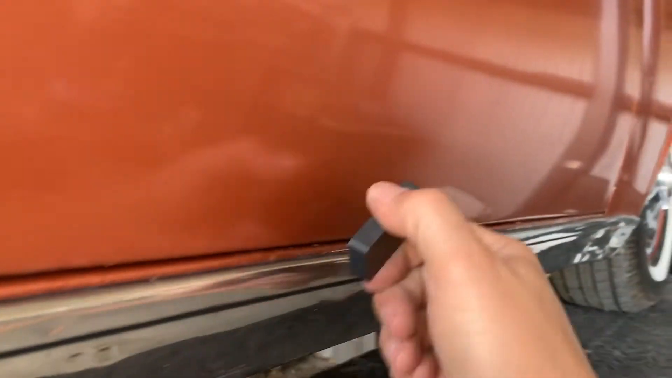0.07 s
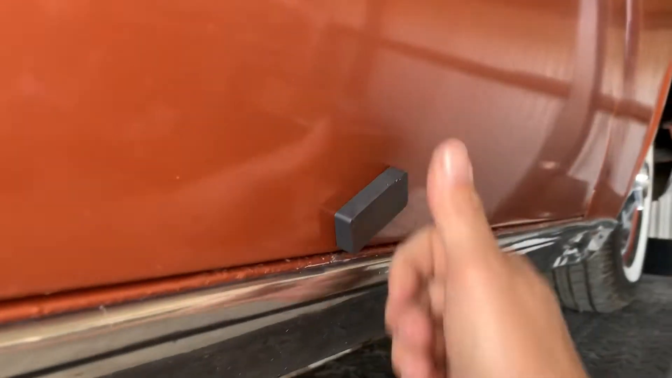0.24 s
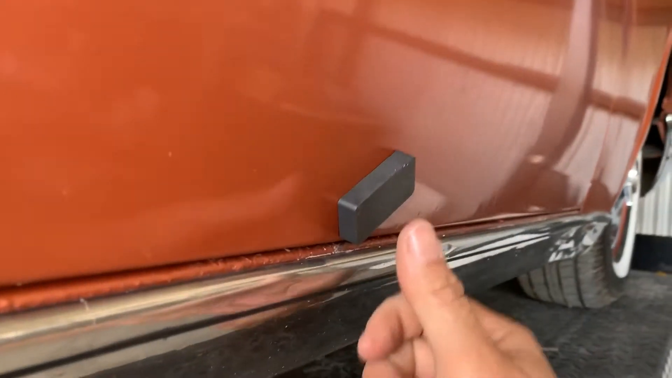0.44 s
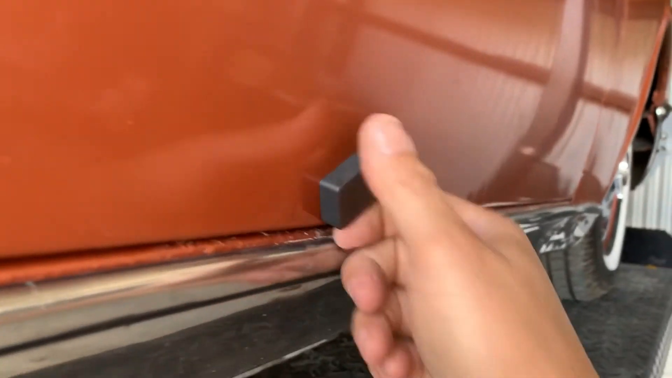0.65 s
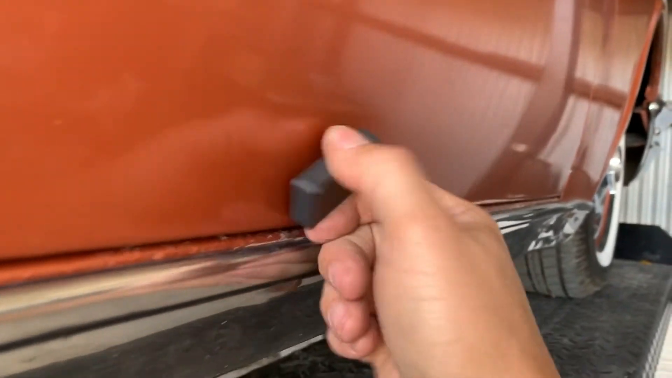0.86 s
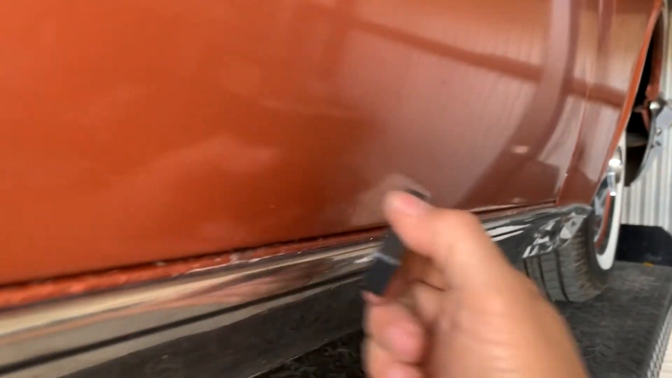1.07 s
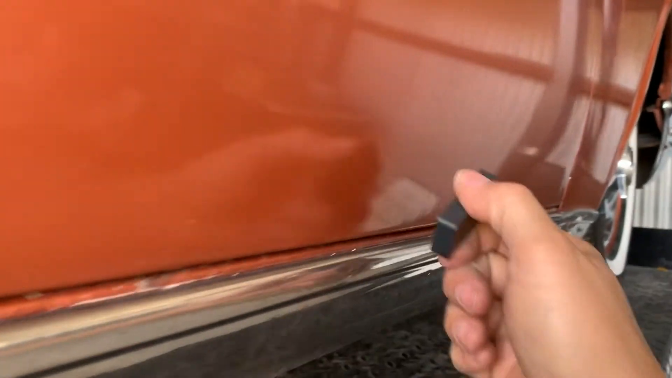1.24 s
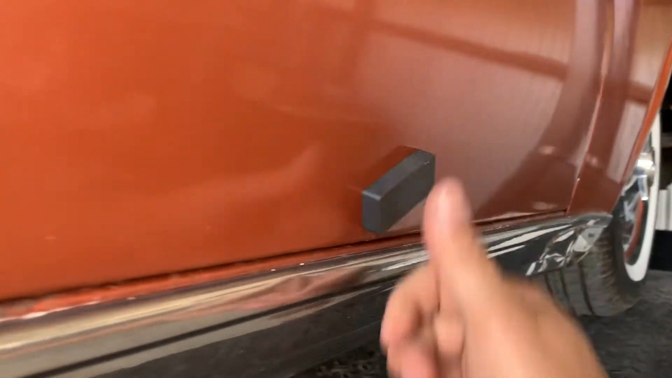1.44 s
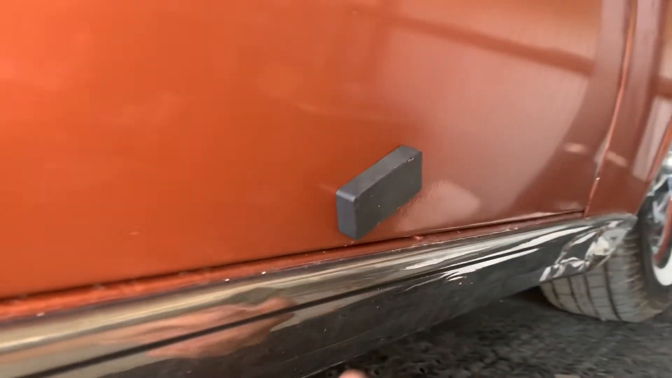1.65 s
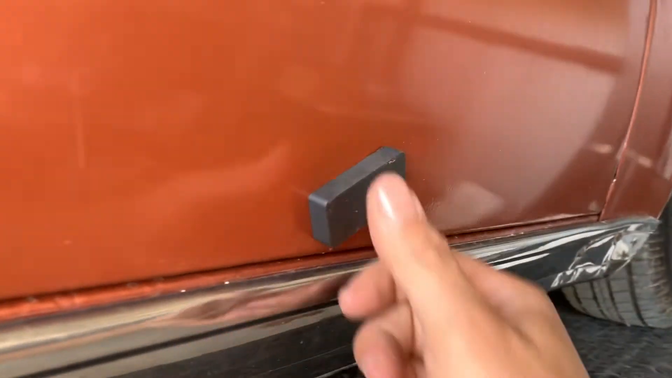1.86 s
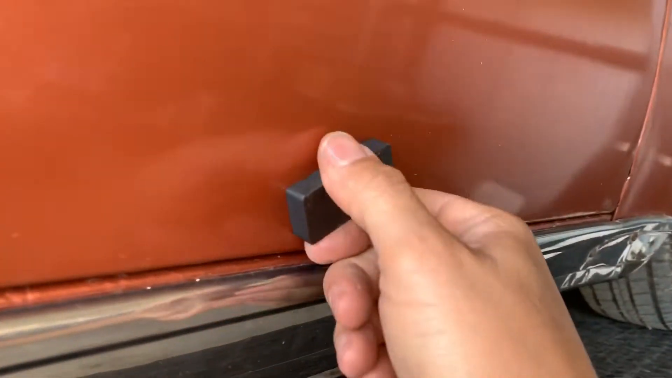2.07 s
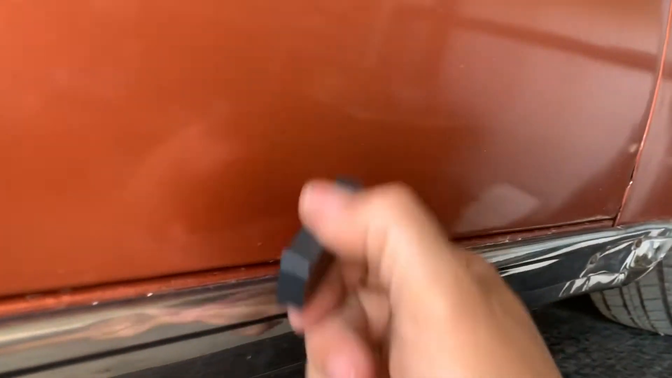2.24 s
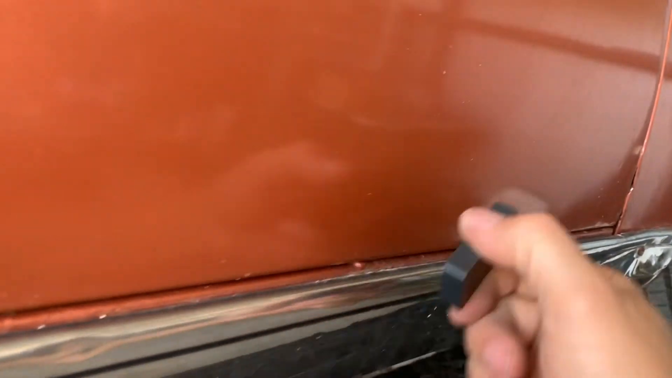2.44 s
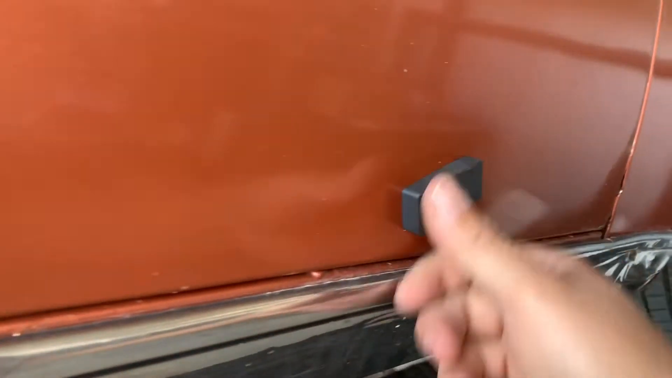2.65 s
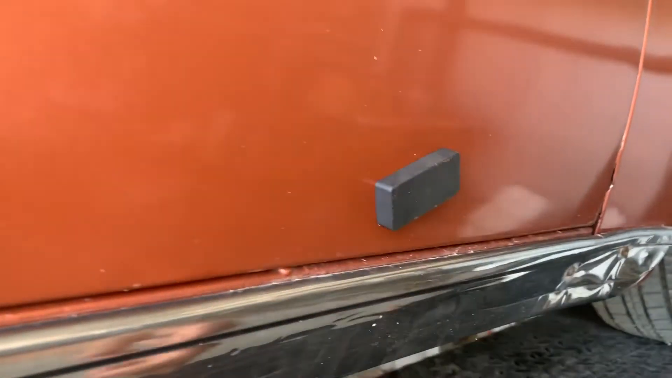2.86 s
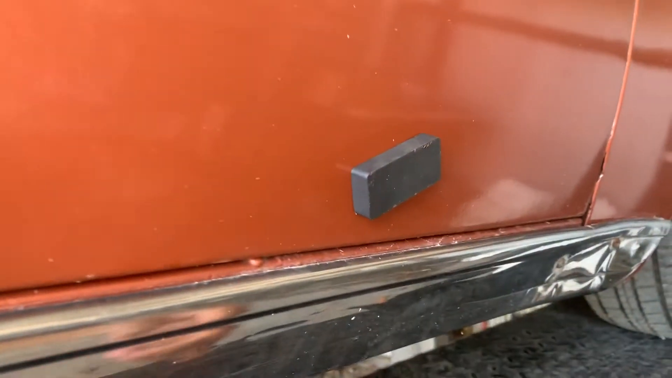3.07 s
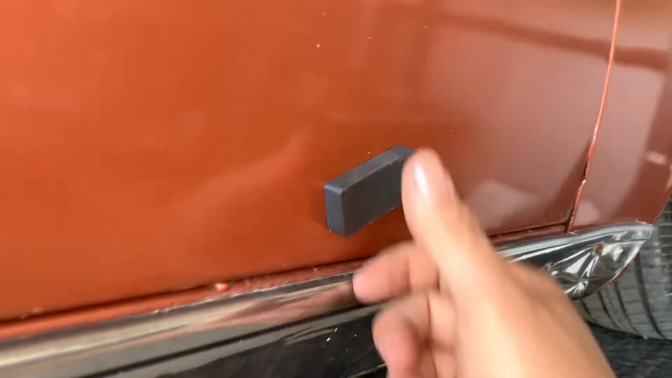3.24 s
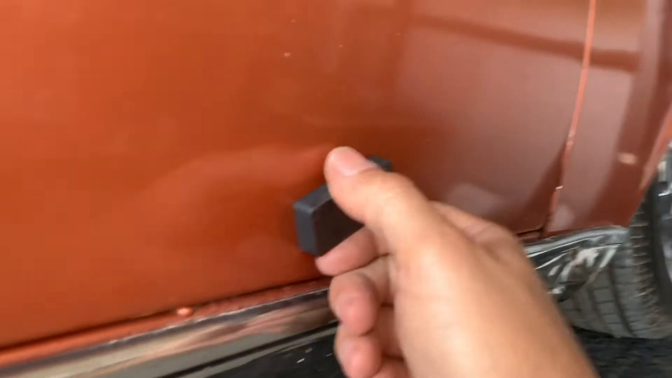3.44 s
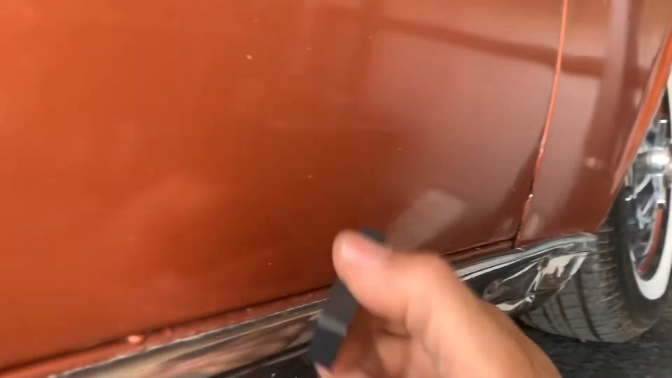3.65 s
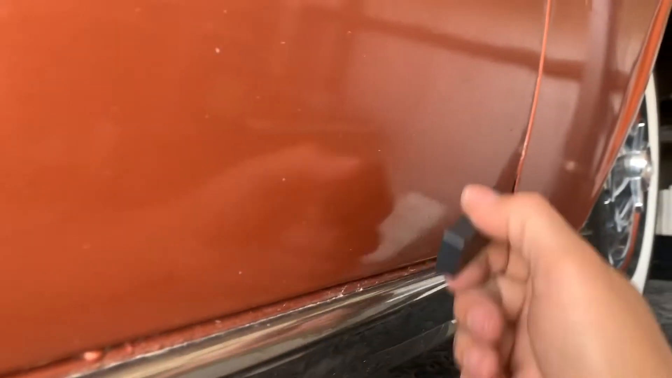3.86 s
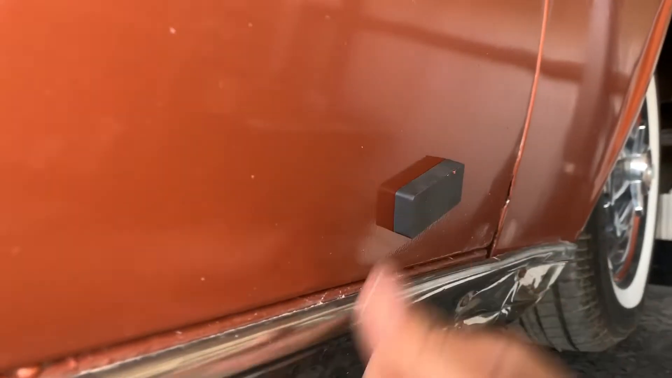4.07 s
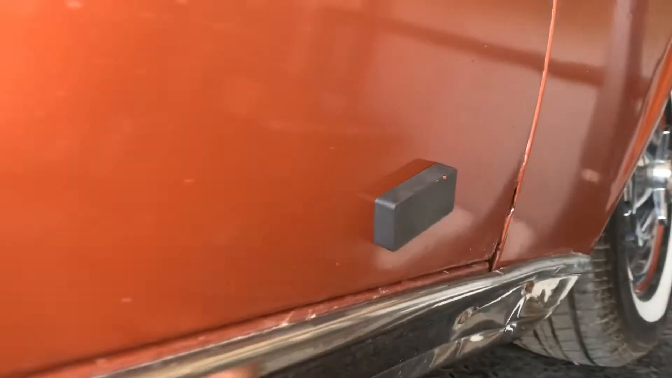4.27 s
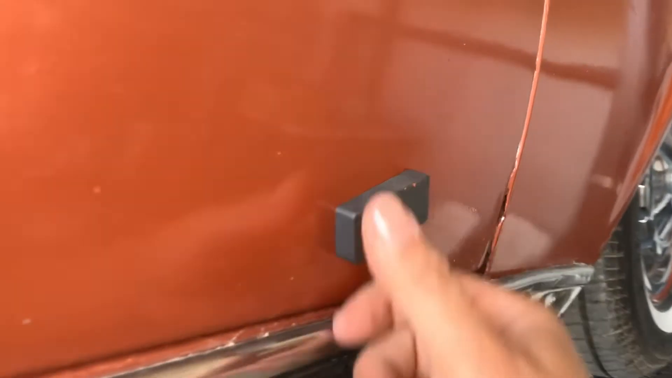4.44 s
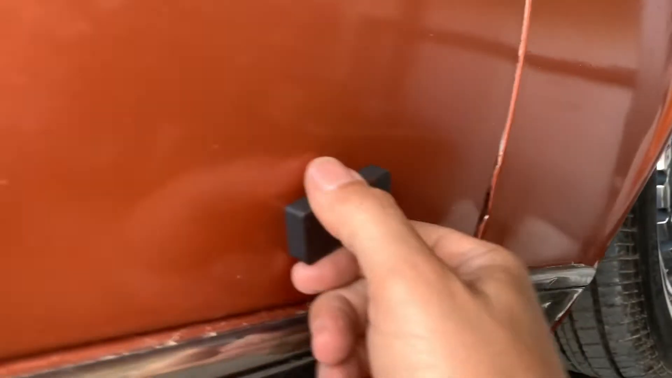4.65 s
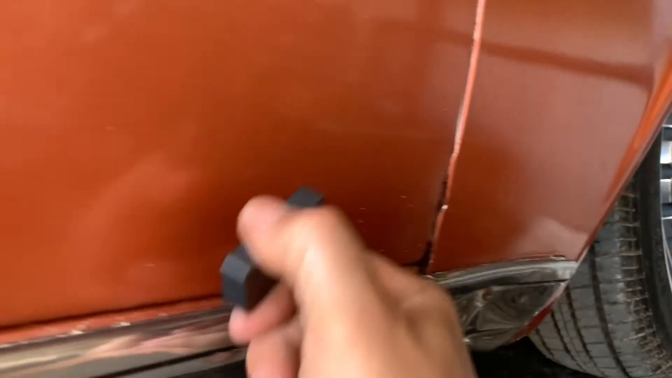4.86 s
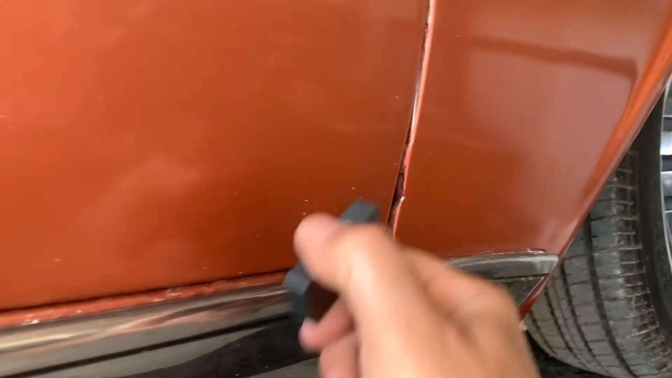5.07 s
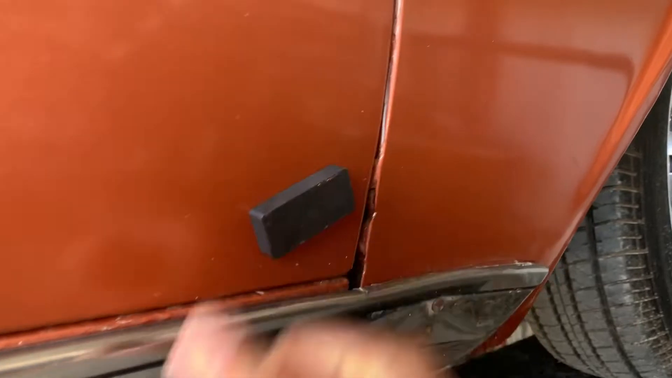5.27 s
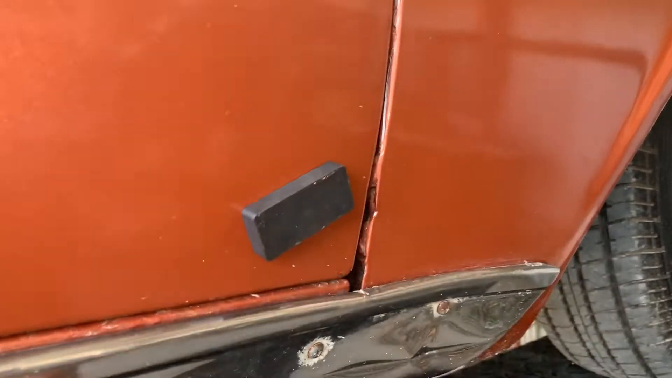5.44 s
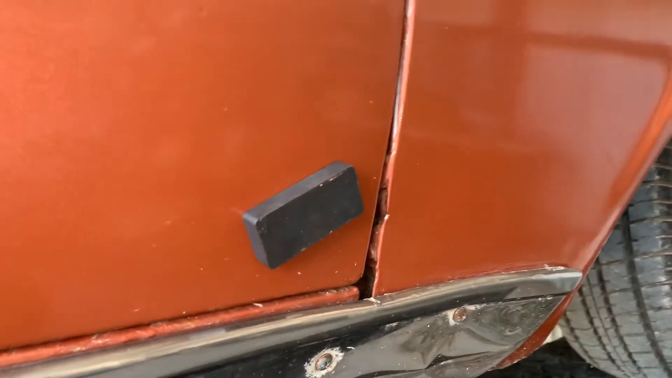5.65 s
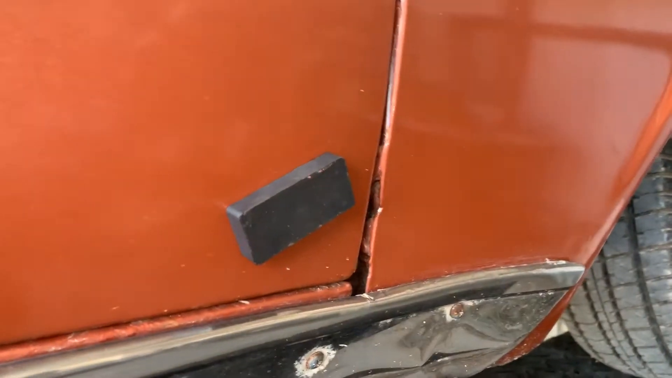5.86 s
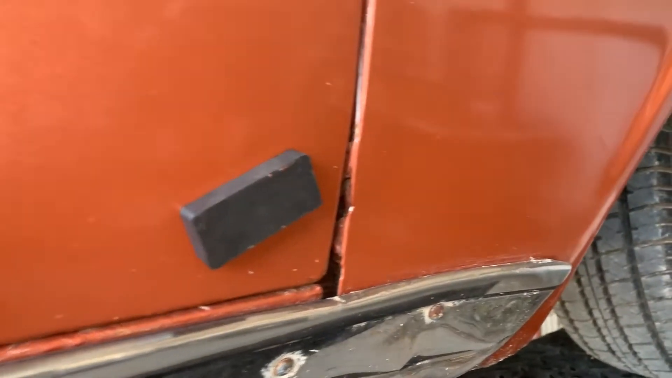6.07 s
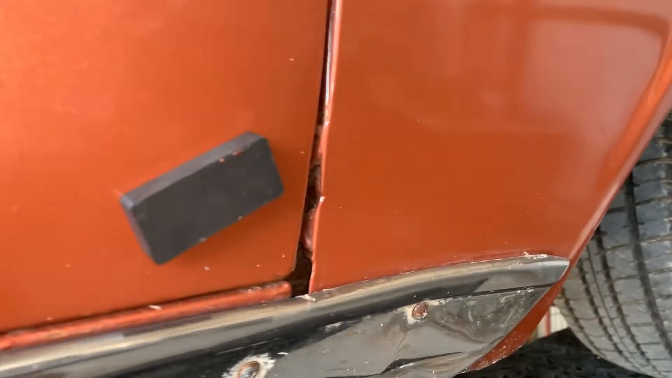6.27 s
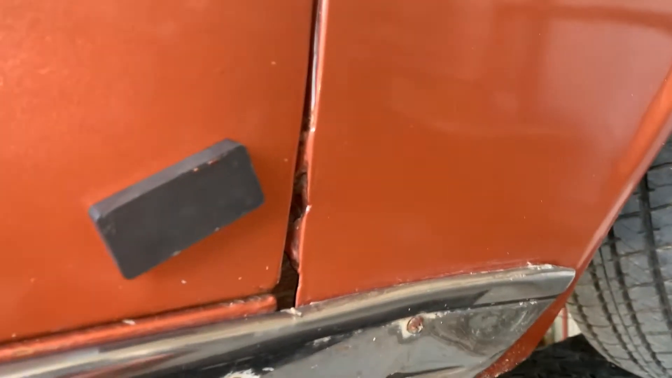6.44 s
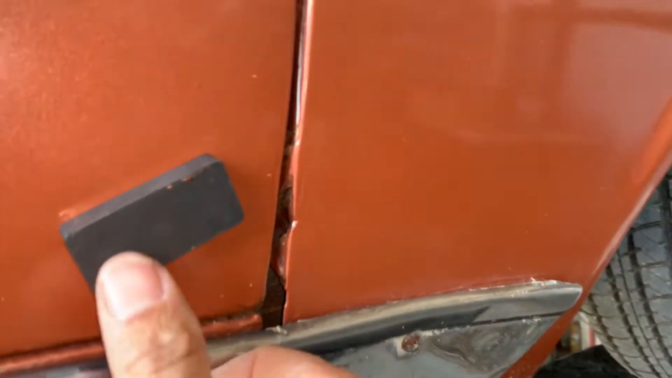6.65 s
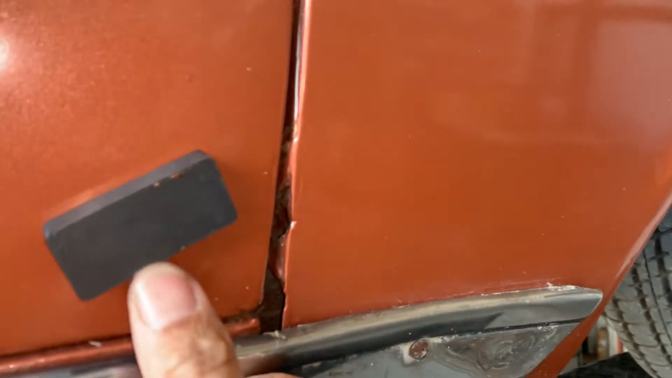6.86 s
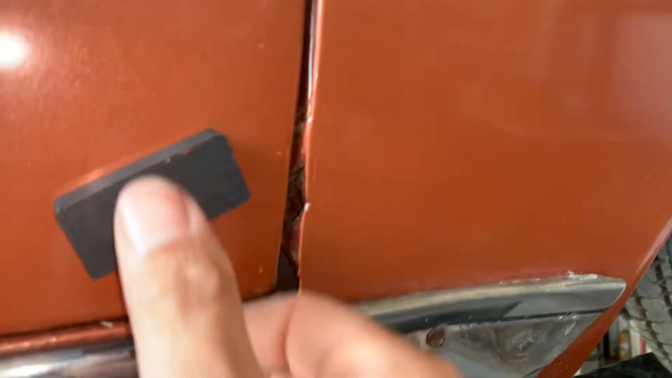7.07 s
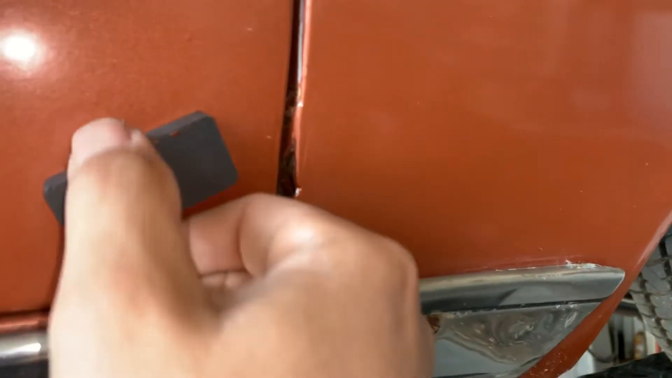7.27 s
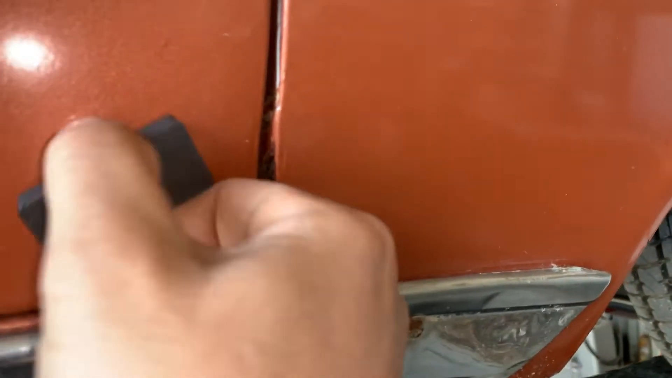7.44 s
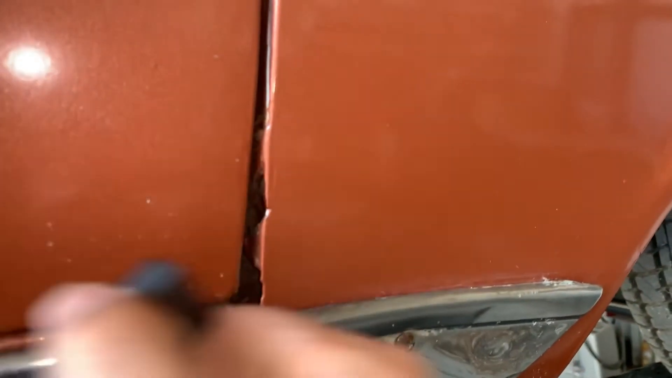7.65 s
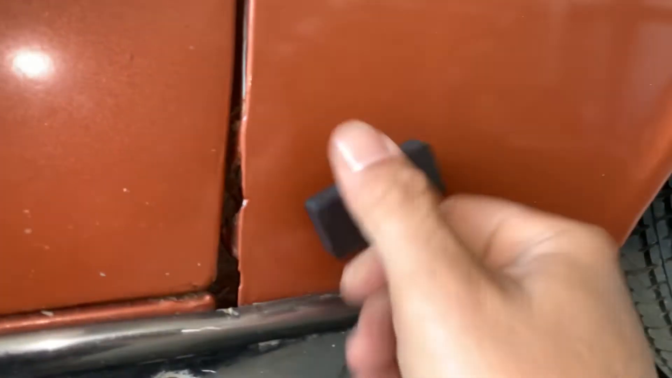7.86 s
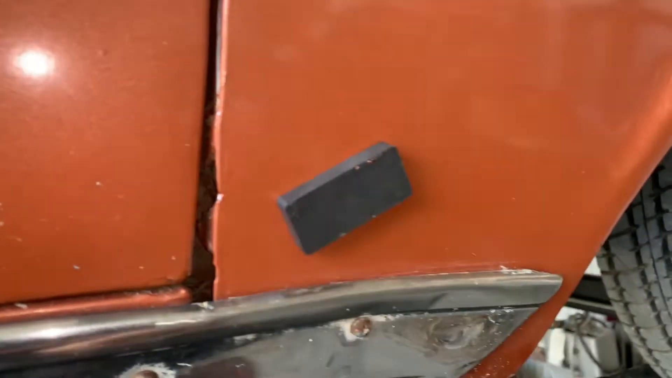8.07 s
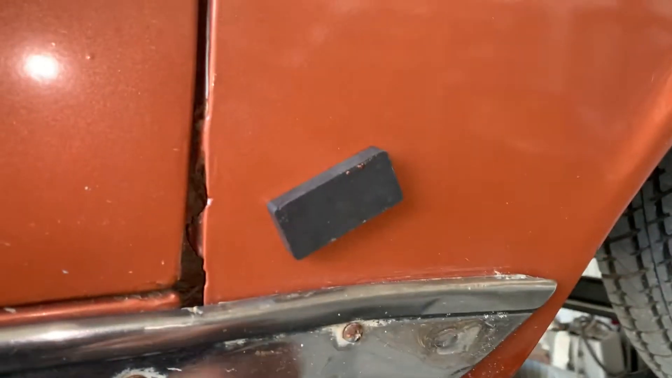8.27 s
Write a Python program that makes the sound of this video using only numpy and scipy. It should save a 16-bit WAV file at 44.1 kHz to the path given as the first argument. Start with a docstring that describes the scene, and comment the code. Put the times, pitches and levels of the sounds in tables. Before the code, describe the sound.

A small magnet snaps onto a steel car door six times, each sharp click followed by a brief ringing boom, over a low hum.

```python
"""A block magnet snaps onto a steel car door six times, close to a phone, inside a garage.
Each snap lands edge first, then rocks flat: a cluster of bright clicks that ring the door skin.
Just after each snap, a ringing boom swells up and fades. Fingers tick and rub on the paint and
a hand bumps the phone. Behind it all, a machine hums with beating tones and faint whines come
and go over a wash of air noise."""
import sys
import numpy as np
from scipy import signal
from scipy.fft import rfft, irfft, next_fast_len
from scipy.io import wavfile
from scipy.ndimage import uniform_filter1d

SR = 44100
rng = np.random.default_rng(int(sys.argv[2]) if len(sys.argv) > 2 else 0)


def transcribe(u):
    """Save the signal u as a 16-bit wav file named by the first command-line argument.

    u: samples, shape (n,) or (channels, n), limited to [-1, 1]; the rate is SR.
    q: integer samples, one column per channel.
    """
    v = np.clip(np.atleast_2d(u).T, -1, 1)
    q = np.round(v * 32767).astype(np.int16)
    wavfile.write(sys.argv[1], SR, q)


N = 366471

# The click's colour. Each row: frequency in Hz, relative level in dB.
CLICK_COLOUR = [(900, -25), (1500, -16.5), (2800, -10), (5200, -9), (8100, -1.5), (9200, -15.5), (10600, 8),
                (11700, -15), (13500, -15.5), (15400, -18), (16500, -37)]
# The stereo image close to the door. Each row: frequency in Hz, left minus right in dB.
NEAR_BALANCE = [(60, 5), (110, -11), (200, 3.5), (380, -8), (700, 3.5), (1290, 6.5), (2380, 1), (4400, -15),
                (8120, 6.5), (15000, -7)]


def click(count, tilt):
    """A hard contact, peak 1: a crack that reaches the right microphone port first, then a rattle."""
    rise_s, crack_t60_s, rattle_t60_s, rattle_db = .0011, .007, .028, -15
    port_lag_s = np.array([[.00007], [0]])
    t = np.arange(count) / SR
    hz, noise = wash(count, CLICK_COLOUR, NEAR_BALANCE)
    noise = irfft(noise * undb(at(tilt, hz))) * np.minimum(t / rise_s, 1)
    crack = noise[0] * 1000. ** (-t / crack_t60_s)
    crack = irfft(rfft(crack) * np.exp(-2j * np.pi * hz * port_lag_s))
    rattle = undb(rattle_db) * noise * 1000. ** (-t / rattle_t60_s)
    burst = crack + rattle
    return burst / abs(burst).max()


# The magnet hits steel, edge first, then rocking flat. Each row: start in seconds, click peak in dB
# before panning, skin ring over the click in dB, pitch the skin favours there in Hz.
MAGNET_HITS = [(.1700, 0, -19, 1890), (.1765, -14, 4.5, 990), (1.3640, -8, -11, 2830),
               (1.3705, 3.5, -21, 2000), (1.3773, -5, -3, 1020), (1.389, -16, 5.5, 336),
               (1.404, -17.5, 6.5, 1020), (2.6103, -2.5, -9, 1400), (2.6140, -1, -10, 624),
               (2.6203, 2, -11, 1100), (2.638, -17.5, 8.5, 1420), (2.6425, -16, 3, 1070),
               (2.655, -22, 6, 1900), (3.9643, 1.5, -19, 1400), (3.9672, -5, -7.5, 1400),
               (3.9757, 1, -11.5, 336), (3.994, -16, 4.5, 420), (5.1865, -5, -15, 2900),
               (5.1915, 0, -24, 2900), (5.1970, -1, -15, 1650), (5.211, -17, 6, 1660),
               (7.9063, 0.5, -11.5, 1680), (7.9095, -5, -10, 1690), (7.9148, -5.5, -7.5, 640),
               (7.938, -19, 8, 1000), (7.962, -22, 7, 1650)]
# Light ticks of a fingernail or a corner of the magnet. Each row reads like a magnet hit.
LIGHT_TICKS = [(0.844, -32, -13, 1900), (1.9194, -43, 12, 1100), (4.7686, -38, -16, 1900),
               (4.828, -38, 2, 1400), (6.6272, -21.5, -9.5, 1760), (7.16, -32, 4.5, 640),
               (8.0474, -35, 4, 640)]
# Softer things tick duller. Each row: frequency in Hz, gain in dB.
TICK_TILT = [(1000, 3), (3000, 4.5), (14000, -8)]
# The door skin's short ring. Each row: pitch in Hz, relative level in dB, T60 in seconds.
SKIN_MODES = [(334, -4.5, 0.034), (482, -5.5, .03), (630, 1, 0.022), (1070, 0, 0.016), (1420, -3, 0.026),
              (1636, -8, 0.037), (1930, -10, 0.035), (2952, -19, 0.048)]


def door_contacts(hits, tilt):
    """Each contact clicks and rings the door skin; modes near the spot's favoured pitch ring louder."""
    out, count = np.zeros((2, N)), 2048
    hz = np.arange(count // 2 + 1) * SR / count
    attack = np.minimum(np.arange(count) / (.002 * SR), 1)
    for start, peak_db, skin_db, spot_hz in hits:
        modes = [(f, db + 7.5 * near(f, spot_hz, width_oct=.18), t60) for f, db, t60 in SKIN_MODES]
        skin = ring(modes, count, scatter_db=3) * attack
        skin = irfft(rfft(skin / abs(skin).max()) * sides(at(NEAR_BALANCE, hz)))
        pan_db = 2 + 6 * rng.standard_normal()  # scattered, leaning left
        hit = click(count, tilt) + undb(skin_db) * skin
        add(out, start, undb(peak_db) * sides(pan_db)[:, None] * hit)
    return out


# The long ring inside the boom. Each row: pitch in Hz, relative level in dB, T60 in seconds.
BOOM_MODES = [(167.9, -6.5, 0.49), (248, -14, 0.15), (322, -8, 0.18), (390, -14, 0.3), (466, -15, 0.2),
              (535, -8, 0.15), (669, -17, 0.3), (795, -17, .3), (920, -13, 0.25), (1095, -15, 0.75),
              (1155, -15, .5), (1390, -16, .3), (1650, -12, 0.35), (1960, -19, 0.36), (2220, -18, .4),
              (2530, -21, .35), (2750, -22, 0.25), (3035, -21, 0.45)]


def boom_ring(count, boost_db, late, main_hz, main_t60):
    """Each mode is a close, beating pair; left and right carry its halves in different shares."""
    split = .012  # gap within a pair, as a share of its pitch
    modes = [(f, db + boost_db(f), t60 * (main_t60 / t60) ** near(f, main_hz))
             for f, db, t60 in BOOM_MODES]
    detuned = lambda ratio: [(f * ratio, db, t60) for f, db, t60 in modes]
    lower = ring(detuned(1 - split / 2), count, scatter_db=3.5, late=late)
    upper = ring(detuned(1 + split / 2), count, scatter_db=.5, late=late)
    return np.array([1.2 * lower + .5 * upper, .5 * lower + .8 * upper])


# The boom just after each snap. Each row: start in seconds, level in dB, bass, low mids and treble over
# the mids in dB, rise in seconds, bass lag at 170 Hz in seconds, decay stretch factor, ring in dB,
# main favoured pitch in Hz, its boost in dB and T60 in seconds, a second favoured pitch in Hz and
# its boost in dB.
BOOM_CUES = [(.182, -22, 10, 4, 2, 0.011, .016, 1, -2, 314, 14.5, 0.17, 1150, 4.8),
             (1.385, -21.5, 8.5, 8.5, 0.5, 0.021, 0.0074, 1.03, -2.5, 316, 9.1, 0.25, 940, 4),
             (2.634, -23, 3, 2.5, 0.5, 0.005, .013, 1.01, -5, 169, 12, 0.7, 1125, 9.1),
             (3.989, -22.5, 8.5, 8, 3.5, 0.009, .022, 1.06, -5, 380, 13.5, 0.21, 170, 7),
             (5.209, -24, -6, 0, 3.5, 0.004, 0.022, 1.32, -2, 537, 17.6, 0.16, 1650, 3.4),
             (7.918, -20, 3, 4, -4.5, 0.011, .045, 1.17, -7.5, 556, 8.8, 0.52, 884, 5.3)]
# The boom's colour. Each row: frequency in Hz, relative level in dB.
BOOM_COLOUR = [(47, -32.5), (80, -14), (312, -8), (426, -10.5), (951, -9.5), (1860, -13.5), (3390, -19.5),
               (5530, -26), (8270, -24.5), (9040, -24), (10100, -33.5), (13800, -22), (15400, -28),
               (16500, -46)]
# The decay of the boom's noise before stretching. Each row: frequency in Hz, T60 in seconds.
BOOM_DECAY = [(100, 0.38), (300, 0.55), (1000, 0.72), (3000, 0.85), (7000, 0.44), (13000, 0.14)]


def ringing_boom():
    """A noisy body swells up, the bass last, and fades band by band; long tones ring on inside it."""
    out, t = np.zeros((2, N)), np.arange(32768) / SR
    noise_share = .7  # the noise gets this share of the favoured pitches' boost
    swell = lambda span: np.clip(t / span, 0, 1) ** .32
    punch = 1 + undb(2) * 1000. ** (-t / .21)  # a louder front that is soon over
    for (start, level_db, bass_db, low_db, treble_db, rise, bass_lag, stretch, ring_db,
         main_hz, main_db, main_t60, second_hz, second_db) in BOOM_CUES:
        tilt = [(170, bass_db), (420, low_db), (1200, 0), (6000, treble_db), (13000, 1.6 * treble_db)]
        main = lambda f: main_db * near(f, main_hz)
        second = lambda f: second_db * near(f, second_hz)
        late = lambda f: bass_lag * min(170 / f, 1.5) ** 1.73  # the lag shrinks towards the treble
        hz, noise = wash(len(t), BOOM_COLOUR, BALANCE)
        noise = noise * undb(at(tilt, hz) + noise_share * second(hz))
        noise = noise * ripple(hz, width_hz=60, patchy_db=2.5)
        tail = sum(irfft(noise * weights) * fade(t, late(f), stretch * at(BOOM_DECAY, f))
                   for f, weights in bands(hz, per_octave=1))
        favoured = irfft(noise * (undb(noise_share * main(hz)) - 1)) * fade(t, late(main_hz), main_t60)
        body = (tail + favoured) * punch * swell(rise)
        boost_db = lambda f: ring_db + .4 * at(tilt, f) + main(f) + second(f)
        tones = boom_ring(len(t), boost_db, late, main_hz, main_t60) * swell(rise + .01)
        add(out, start, undb(level_db) * (body + tones))
    return out


# Fingers on the paint. Each row: midpoint in seconds, half-length in seconds, band centre in Hz,
# bandwidth in Hz, level at the midpoint in dB.
FINGER_RUBS = [(2.186, .1, 8900, 9000, -62), (3.34, 0.067, 6840, 11100, -50),
               (4.62, 0.11, 12130, 1500, -61), (4.765, 0.024, 8950, 8950, -50.5),
               (5.107, 0.19, 10800, 7000, -66), (5.737, .07, 8900, 9000, -59),
               (6.277, 0.049, 7880, 9870, -54.5), (6.8, 0.08, 11000, 7930, -63),
               (6.962, 0.044, 12000, 5000, -73), (7.44, 0.054, 10900, 6860, -64)]


def finger_rubs():
    """Skin slides on paint: short swells of high, grainy hiss."""
    out = np.zeros((2, N))
    for middle, half_length, centre_hz, width_hz, level_db in FINGER_RUBS:
        count = 2 * int(half_length * SR)
        grain = rng.standard_normal((2, count)) * undb(3 * rng.standard_normal(count))
        hz = np.arange(count // 2 + 1) * SR / count
        rub = irfft(rfft(grain) * np.exp(-(2 * (hz - centre_hz) / width_hz) ** 2))
        add(out, middle - half_length, undb(level_db) * rub / rub.std() * np.hanning(count))
    return out


# Handling thumps. Each row: start in seconds, pitch in Hz, peak in dB.
HAND_BUMPS = [(3.275, 71.4, -19.5), (5.2, 45.27, -25), (5.901, 55.5, -23)]


def hand_bumps():
    """A hand bumps the phone: a dull cycle and a half of bass, dead centre."""
    out = np.zeros((2, N))
    for start, hz, peak_db in HAND_BUMPS:
        t = np.arange(int(1.5 * SR / hz)) / SR
        thump = -np.sin(2 * np.pi * hz * t) * np.hanning(len(t))
        add(out, start, undb(peak_db) * np.array([thump, thump]))
    return out


# The machine's tones. Each row: pitch in Hz, base level in dB, level waver in dB.
HUM_TONES = [(97, -38, 1.5), (111, -36, 1.5), (124, -45, 2.5), (167, -51, 3)]
# The fader ride on the hum. Each row: time in seconds, gain in dB.
HUM_RIDE = [(0, -7.5), (1.3, 0), (2, 1), (3.5, -4), (4.7, 1), (6, 1.5), (7.3, 0), (8.31, 0)]


def machine_hum():
    """Close tones beat against each other while each wavers in level and pitch."""
    t, hum = np.arange(N) / SR, np.zeros(N)
    for hz, db, waver_db in HUM_TONES:
        level = np.sqrt(2) * undb(db + waver_db * walk(6.1))
        pitch = hz * (1 + .00497 * walk(3))
        hum += level * np.sin(2 * np.pi * (np.cumsum(pitch) / SR + rng.random()))
    ride = undb(np.interp(t, *np.transpose(HUM_RIDE)))
    return hum * ride * sides(-2.27)[:, None]


# Distant whines. Each row: start and end in seconds, pitch in Hz, level in dB, upper octave relative
# to that in dB, waver as a share of the pitch.
FAR_WHINES = [(5.34, 5.66, 1000, -43, -9, .03), (5.62, 5.92, 1427, -49, -30, .006),
              (6.46, 6.9, 980, -47, -3, .008), (6.8, 7.18, 1000, -45, -4, .02),
              (5.95, 7.7, 1525, -59, -30, .006), (6.25, 6.6, 850, -52, -30, .015),
              (5.65, 5.92, 865, -53, -30, .01)]


def far_whines():
    """Faint, far tones fade in and out, fluttering in pitch and level."""
    t, out = np.arange(N) / SR, np.zeros((2, N))
    fade_s, stereo_phase_rad = .09, np.array([[0], [1.5]])
    for start, end, hz, db, octave_db, waver in FAR_WHINES:
        gate = np.clip(np.minimum(t - start, end - t) / fade_s, 0, 1)
        phase = 2 * np.pi * np.cumsum(hz * (1 + waver * walk(90))) / SR + stereo_phase_rad
        tone = np.sin(phase) + undb(octave_db) * np.sin(2 * phase)
        flutter = 1 + .55 * walk(40)
        out += gate * undb(db) * flutter * tone
    return np.sqrt(2) * out


# The air's colour. Each row: frequency in Hz, relative level in dB.
AIR_COLOUR = [(20, -24.5), (40, -16.5), (60, -14.5), (105, -10.5), (140, -12), (200, -18), (300, -14.5),
              (500, -17.5), (800, -23), (1000, -22), (1300, -25.5), (1550, -23.5), (1800, -29),
              (3400, -37.5), (4200, -36), (5500, -45), (8600, -48), (9600, -70.5), (14000, -62.5),
              (16000, -85)]
# Faint resonances in the air noise. Each row: centre in Hz, width in Hz, gain in dB.
AIR_RESONANCES = [(180.2, 35.7, 9), (318, 14, 4), (519, 13, 2), (812, 51, 6.5), (2950, 280, 2),
                  (4100, 240, -0.5), (4600, 530, 2)]
# Fader rides on the low rumble and on the rush above it. Each row: time in seconds, level in dB.
RUMBLE_RIDE = [(0, -40.5), (2.1, -40), (3, -41), (4.8, -40), (5.7, -35.5), (6.4, -41), (7.2, -39),
               (8.31, -39.5)]
RUSH_RIDE = [(0, -38.5), (2.3, -39), (3.4, -39.5), (5.1, -39), (6.8, -38), (8.31, -38.5)]


def air_noise():
    """A steady bed of air whose bands flicker independently; its rumble swells slowly and gusts."""
    t, count = np.arange(N) / SR, 2 * next_fast_len(N // 2 + 1)
    hz, noise = wash(count, AIR_COLOUR, BALANCE)
    resonance_db = sum(db / (1 + (2 * (hz - f) / width) ** 2) for f, width, db in AIR_RESONANCES)
    noise = noise * ripple(hz, width_hz=39.87, patchy_db=3) * undb(resonance_db)
    parts = [(f, irfft(noise * weights)[:, :N] * undb(.75 * walk(5)))
             for f, weights in bands(hz, per_octave=.95)]
    rumble = sum(part for f, part in parts if f < 70)
    rush = sum(part for f, part in parts if f > 70)
    rumble_db = np.interp(t, *np.transpose(RUMBLE_RIDE)) + 2.5 * walk(9)
    rush_db = np.interp(t, *np.transpose(RUSH_RIDE))
    return rumble / rumble.std() * undb(rumble_db) + rush / rush.std() * undb(rush_db)


# Stereo width. Each row: frequency in Hz, left-right correlation from -1 to 1.
CORRELATION = [(60, 0.9), (130, 0.94), (290, 0.75), (640, 0.15), (1410, -0.014), (3100, -0.16),
               (6820, 0.32), (15000, 0.0066)]
# The stereo image of the boom and the air. Each row: frequency in Hz, left minus right in dB.
BALANCE = [(60, -0.5), (110, 2.5), (200, -2.5), (380, 2), (700, 1.5), (1290, 2.5), (2380, 2), (4400, -0.5),
           (8120, -1), (15000, 1)]


def wash(count, colour, balance):
    """Frequencies and spectrum of diffuse noise, RMS near 1: narrow in the bass, wide in the treble."""
    hz = np.arange(count // 2 + 1) * SR / count
    mid, side = rfft(rng.standard_normal((2, count)))
    alike = np.clip(at(CORRELATION, hz), -.95, .99)
    mid, side = mid * np.sqrt(1 + alike), side * np.sqrt(1 - alike)
    gain = undb(at(colour, hz))
    gain = gain / np.sqrt(2 * np.mean(gain ** 2))
    return hz, np.array([mid + side, mid - side]) * gain * sides(at(balance, hz))


def ring(modes, count, scatter_db, late=lambda f: 0):
    """Decaying modes; where the blow lands changes their strength, sign and, slightly, pitch."""
    t, out = np.arange(count) / SR, np.zeros(count)
    for f, db, t60 in modes:
        strength, polarity, detune = rng.standard_normal(3)
        tone = np.sign(polarity) * np.sin(2 * np.pi * f * (1 + .0097 * detune) * t)
        out += undb(db + scatter_db * strength) * tone * fade(t, late(f), t60)
    return out


def fade(t, late, t60):
    """Swells for late seconds, then falls 60 dB every t60 seconds."""
    return np.minimum(t / (late + 1 / SR), 1) ** 2 * 1000. ** (-np.maximum(t - late, 0) / t60)


def ripple(hz, width_hz, patchy_db):
    """Many crowded resonances: a random gain that wanders along the frequency axis."""
    knots = rng.standard_normal(int(SR / 2 / width_hz) + 2)
    return undb(patchy_db * np.interp(hz / width_hz, np.arange(len(knots)), knots))


def near(f, spot_hz, width_oct=.2):
    """A bell curve: 1 at the favoured pitch, fading away from it."""
    return np.exp(-(np.log2(np.maximum(f, 1) / spot_hz) / width_oct) ** 2)


def bands(hz, per_octave):
    """Overlapping triangular bands, each as its centre in Hz and its weights."""
    octave = np.log2(np.maximum(hz, 1))
    for centre in np.arange(4, 14.6, 1 / per_octave):
        yield 2 ** centre, np.clip(1 - abs(octave - centre) * per_octave, 0, 1)


def walk(rate):
    """Random levels held 1 / rate seconds and slewed twice; spread near 1."""
    hold = int(SR / rate)
    steps = np.repeat(rng.standard_normal(N // hold + 1), hold)
    return 1.3 * uniform_filter1d(uniform_filter1d(steps, hold), hold)[:N]


def undb(db):
    """Decibels to gain."""
    return 10 ** (np.asarray(db) / 20)


def at(table, hz):
    """Value of a (Hz, value) table on a log-frequency axis."""
    f, values = np.transpose(table)
    return np.interp(np.log(np.maximum(hz, 1)), np.log(f), values)


def sides(db):
    """Left and right gains for a level difference."""
    return undb(np.array([db, -db]) / 2)


def add(out, start, sound):
    """Mix a stereo sound in at start seconds."""
    i = int(start * SR)
    out[:, i:i + sound.shape[1]] += sound[:, :N - i]


def scene():
    """The mix: snaps and their booms up front, then the hands, the machine and the air."""
    snaps = door_contacts(MAGNET_HITS, tilt=[(1, 0)])  # flat tilt
    ticks = door_contacts(LIGHT_TICKS, TICK_TILT)
    foreground = snaps + ticks + ringing_boom() + finger_rubs() + hand_bumps()
    return foreground + machine_hum() + far_whines() + air_noise()


def record(dry):
    """A narrow band of treble near 10.6 kHz is dipped; the phone rounds the peaks and cuts the top."""
    notch_hz, notch_width_hz, notch_db, top_hz = 10570, 920, -24.5, 15900
    count = 2 * next_fast_len(N // 2 + 1)
    hz = np.arange(count // 2 + 1) * SR / count
    notch = undb(notch_db * np.exp(-((hz - notch_hz) / notch_width_hz) ** 4))
    heard = irfft(rfft(dry, count) * notch)[:, :N]
    lowpass = signal.ellip(8, .2, 70, top_hz, fs=SR, output="sos")
    return signal.sosfilt(lowpass, np.tanh(heard))


dry = scene()
out = record(dry)
transcribe(out)
```